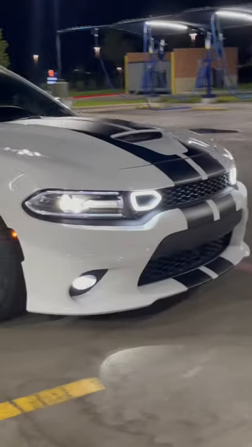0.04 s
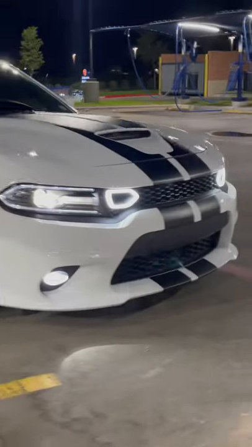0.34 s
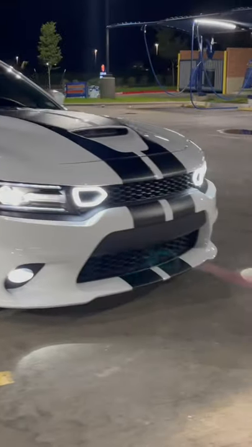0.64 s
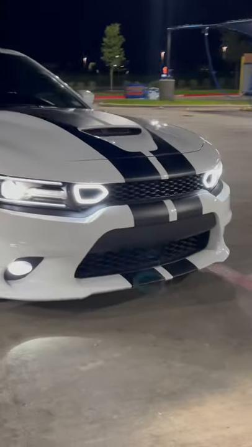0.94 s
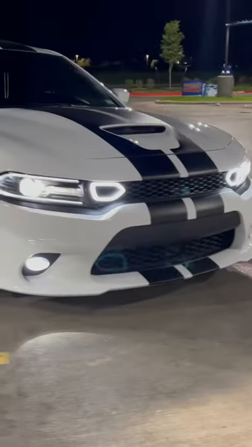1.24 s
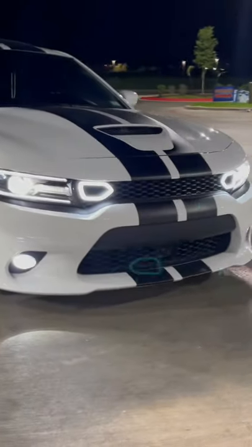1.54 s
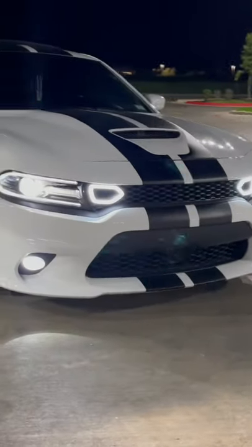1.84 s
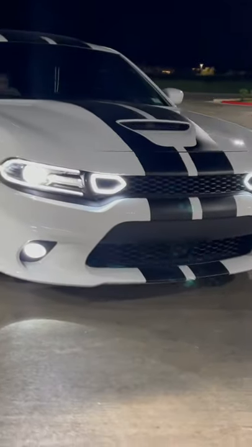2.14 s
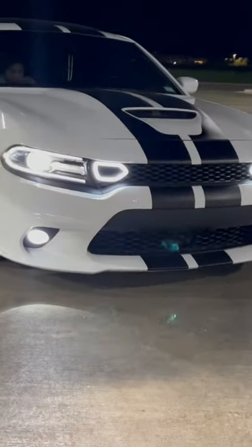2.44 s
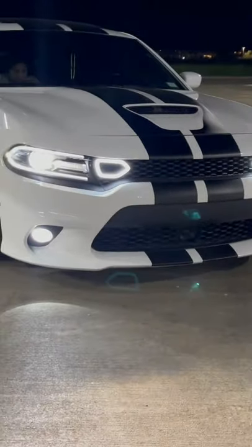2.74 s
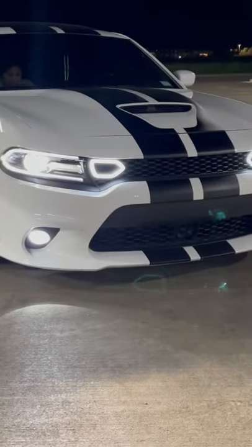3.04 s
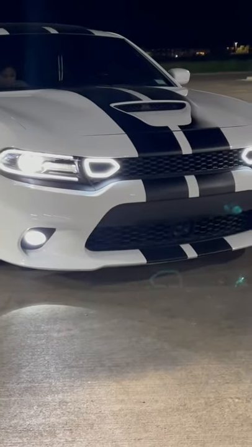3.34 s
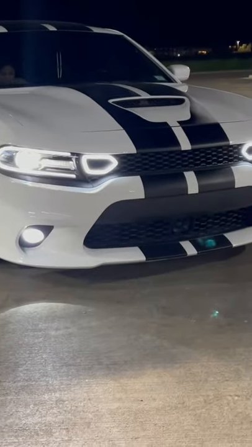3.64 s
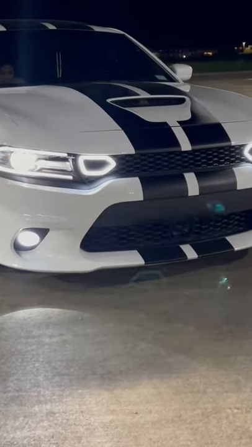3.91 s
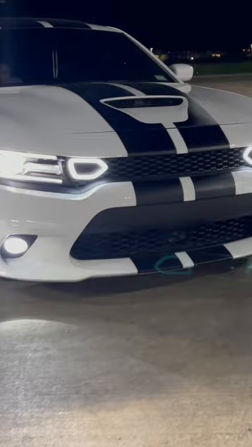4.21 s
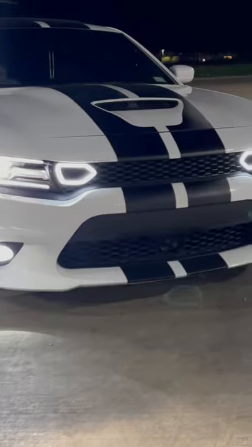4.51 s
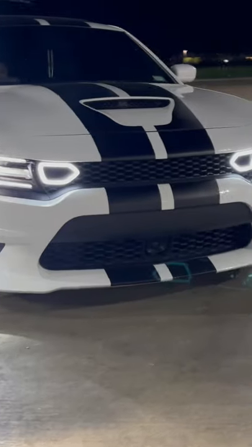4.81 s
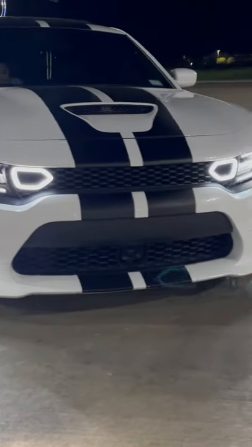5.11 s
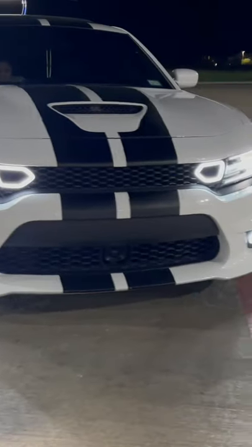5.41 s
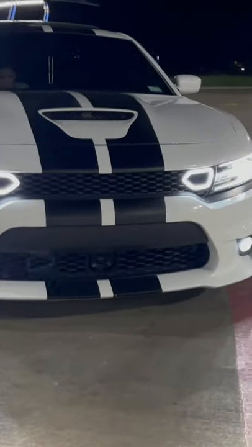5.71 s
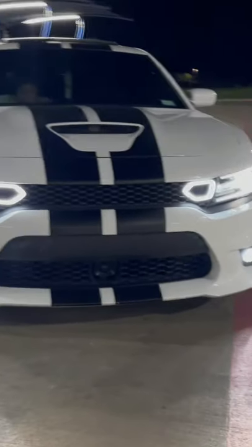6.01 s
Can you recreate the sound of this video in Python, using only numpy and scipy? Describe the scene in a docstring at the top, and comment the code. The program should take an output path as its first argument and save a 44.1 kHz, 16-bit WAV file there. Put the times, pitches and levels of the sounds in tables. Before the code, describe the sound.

A big V8 car creeps closer at idle, its exhaust throbbing under whirring belts and ticking valves.

```python
"""An open concrete lot; a big V8 saloon creeps towards a stereo microphone at idle speed.
A few dull bumps sound as it starts to roll, its exhaust muffled. Within a second the exhaust opens up,
throbbing in uneven orders over a rumble of irregular firings. The idle sags once as the car steers round,
and its nose comes to face the microphone: through the grille, the whirr of belt and fan and the ticking
of the valve gear, their hiss growing as the car draws nearer."""
import sys
import numpy as np
from scipy import signal
from scipy.fft import rfft, irfft, next_fast_len
from scipy.io import wavfile

SR = 44100
rng = np.random.default_rng(int(sys.argv[2]) if len(sys.argv) > 2 else 0)


def waveform_to_disk(signal):
    """Save audio, clipped to [-1, 1], as 16-bit WAV at the path in sys.argv[1]."""
    frames = np.transpose(np.atleast_2d(signal))
    scaled = np.clip(frames, -1, 1) * 32767
    samples = np.round(scaled).astype(np.int16)
    wavfile.write(sys.argv[1], SR, samples)


N = 275974
TIME_S = np.arange(N) / SR
FFT_SIZE = 2 * next_fast_len(N // 2 + SR // 20)   # room for tails
BIN_HZ = np.maximum(np.arange(FFT_SIZE // 2 + 1) * SR / FFT_SIZE, 1)

# the lope, six hard exhaust puffs in each engine cycle: cycle_share, relative_db
EXHAUST_PUFFS = [(.187, 0), (.436, 0), (.56, 0), (.613, .5), (.804, -3), (.938, 1.5)]
# bright spectrum of valve hiss and tyre grit: frequency_hz, relative_db
HISS_SPECTRUM = [(2500, -14), (4500, 5), (5500, 2), (6400, 2), (7600, -1), (8400, 2), (8750, 5),
                 (9200, 3.5), (10200, 5.5), (11300, 6.5), (11700, 5.5), (12300, -27)]


def from_db(db):
    """Decibels to gain."""
    return 10 ** (np.asarray(db) / 20)


def unit_rms(x):
    """Scale to unit power."""
    return x / np.sqrt(np.mean(x ** 2) + 1e-20)


def ramp(start_s, length_s):
    """An even rise from 0 to 1."""
    return np.clip((TIME_S - start_s) / length_s, 0, 1)


def swells(rows, half_length_s):
    """Envelope of bell-shaped swells, one for each row of time_s, level_db."""
    return sum(from_db(db) * np.exp(-((TIME_S - s) / half_length_s) ** 2 / 2) for s, db in rows)


def each_cycle(cycle, beats, width):
    """Rounded beats at set places of the engine cycle; width is a share of the cycle."""
    return sum(from_db(db) * np.exp(-(((cycle - place + .5) % 1 - .5) / width) ** 2)
               for place, db in beats)


def drift(rate_hz):
    """Smooth random wander of spread 1, mostly slower than rate_hz."""
    hop, settle = 100, 1000
    pole = np.exp(-2 * np.pi * rate_hz * hop / SR)
    noise = rng.standard_normal(N // hop + settle + 2)
    slow = signal.lfilter([1], [1, -2 * pole, pole * pole], noise)[settle:]
    return np.interp(np.arange(N) / hop, np.arange(len(slow)), unit_rms(slow))


def resonance(phase, width_hz):
    """A resonance stirred by noise: a carrier whose two quadratures drift."""
    return unit_rms(drift(width_hz) * np.cos(phase) + drift(width_hz) * np.sin(phase))


def over_bins(rows):
    """One curve per column over the FFT bins, straight on a log-frequency axis."""
    hz, *columns = np.transpose(rows)
    return [np.interp(np.log(BIN_HZ), np.log(hz), column) for column in columns]


def at_microphone(spectra):
    """A direct and a scattered sound reach the left and right ports of the microphone."""
    # how the two ports compare: frequency_hz, coherence, left_lead_rad, left_minus_right_db
    ports = [(100, 0.98, 0.52, -1.5), (280, 0.89, 0.48, 0.3), (480, 0.83, 0.45, 2.5),
             (560, 0.34, 0.6, -0.5), (1080, 0.32, 1.52, 0), (1173, 0.57, 0.96, 0.5),
             (1540, 0.22, 2.98, -0.3), (2140, 0.55, 5.3, -1.5), (2580, 0.46, 7.15, 1),
             (4000, 0.71, 6.96, 0.5), (5160, 0.27, 6.4, 4.5), (6540, 0.85, 6.6, 1.5), (7500, 0.6, 7.2, 1.5),
             (8700, 0.9, 6.1, -0.5), (9380, 1, 4.74, 3), (9670, 0.98, 3.53, -4.5), (10440, 1, 2.9, 0.5),
             (11080, 1, 1.32, 0)]
    coherence, lead_rad, balance_db = over_bins(ports)
    direct, scattered = spectra
    sides = np.array([[1], [-1]])
    pair = np.sqrt((1 + coherence) / 2) * direct + sides * np.sqrt((1 - coherence) / 2) * scattered
    placement = from_db(sides * balance_db / 2) * np.exp(.5j * sides * lead_rad)
    return irfft(pair * placement, FFT_SIZE)[:, :N]


def turbulence(envelope, spectrum):
    """Noise under an envelope, coloured at equal power and heard at the microphone."""
    low_hz, high_hz = spectrum[0][0], spectrum[-1][0]
    skirts = np.minimum(BIN_HZ / low_hz, 1) ** 2 * np.minimum(high_hz / BIN_HZ, 1) ** 2
    colour = unit_rms(from_db(over_bins(spectrum)[0]) * skirts)
    noise = envelope * rng.standard_normal((2, N))
    return at_microphone(rfft(noise, FFT_SIZE) * colour)


def pulsing(beats, depth):
    """A unit-power envelope that lifts on each beat."""
    return unit_rms(1 + depth * beats)


def turned_away():
    """1 while the grille points away, falling evenly to 0 as it comes to face the microphone."""
    return 1 - ramp(start_s=0.15, length_s=2.44)


def tyre_grit():
    """Light, bright ticks that sound like grit under the tyres."""
    # single ticks: start_s, relative_db
    ticks = [(.355, -60), (2.0, -66), (2.43, -54), (2.46, -58), (4.565, -56), (5.92, -53), (5.945, -63)]
    rise_s, decay_s = .002, .027
    envelope = np.zeros(N)
    for start_s, db in ticks:
        age_s = np.maximum(TIME_S - start_s, 0)
        envelope += from_db(db) * (1 - np.exp(-age_s / rise_s)) * np.exp(-age_s / decay_s)
    return from_db(7) * turbulence(envelope, HISS_SPECTRUM)


def body_bumps():
    """Blows thud in the car's body as it starts to roll; a longer contact is duller."""
    # blows to the body: start_s, relative_db, contact_s
    bumps = [(.069, -23, .0044), (.086, -20, .0041), (.109, -18, .0056), (.165, -20.5, .0015),
             (.173, -15.5, .0055), (.182, -16.5, .0012), (.209, -21, .0042), (.257, -21.5, .003),
             (.264, -16.5, .0016), (.533, -18.5, .0037), (.566, -21.5, .0012), (1.159, -19, .0022)]
    # what the body rings with: pitch_hz, relative_db, decay_s
    body_modes = [(91, -7, 0.015), (197, 0.5, 0.0092), (286, -7.5, 0.011), (337, -4.5, 0.0065),
                  (448, -6.5, 0.0066)]
    t = np.arange(SR // 5) / SR
    thud = sum((-1) ** k * from_db(db) * np.sin(2 * np.pi * hz * t) * np.exp(-t / decay_s)
               for k, (hz, db, decay_s) in enumerate(body_modes))
    thud *= 1 - np.exp(-t / 0.0035)   # the body takes a moment to answer
    blows = np.zeros(N)
    for start_s, db, contact_s in bumps:
        push = np.hanning(round(contact_s * SR) + 3)
        start = round(start_s * SR)
        blows[start:start + len(push)] += from_db(db) * push / push.sum()
    return signal.fftconvolve(blows, thud)[:N]


def belt_whines(valve_beat):
    """Narrow bands whine and hum under the bonnet, steadily or in swells, roughened by the valves; a few low
    swells of the exhaust boom sound among them."""
    # steady whines of the belt drive: pitch_hz, width_hz, relative_db
    whines = [(447, 6.1, -54), (827, 4.6, -56.5), (1198, 43, -55.5), (2157, 12, -64.5), (2260, 19, -62.5),
              (2430, 20, -60.5), (2533, 13, -66.5), (8750, 44, -74)]
    # the belt sings up again and again at one pitch: time_s, relative_db
    sings = [(1.9, -45), (2.12, -51), (2.42, -46.5), (3.14, -45), (4.15, -49), (4.97, -48), (5.38, -48),
             (5.7, -47)]
    # a lower hum of the belt drive comes and goes: time_s, relative_db
    hums = [(.19, -39), (.44, -37.5), (.76, -39.5), (1.02, -39.5), (1.36, -41), (1.6, -46), (2.79, -45.5),
            (3.58, -48), (4.1, -45)]
    # single swells: resonances under the bonnet that carry only at certain angles, and below 250 Hz brief
    # surges of the exhaust boom: time_s, pitch_hz, width_hz, half_length_s, relative_db
    beams = [(.69, 754, 53, .16, -43.5), (.735, 375, 40, .04, -37), (1.398, 1328, 84, .27, -45.5),
             (1.92, 117, 6, .13, -28.5), (2.3, 2905, 30, .2, -58), (2.7, 4010, 170, .45, -60.5),
             (2.8, 2310, 140, .6, -62), (3.25, 3110, 45, .27, -61.5), (3.8, 2990, 28, .52, -57.5),
             (4.5, 3700, 120, .6, -65), (4.9, 540.2, 56, .57, -51.5), (5.2, 1268, 47, .43, -50.5),
             (5.5, 205, 39, .45, -40.5), (6.15, 150, 30, .3, -31)]
    voices = [(hz, width_hz, from_db(db)) for hz, width_hz, db in whines]
    voices.append((1215, 48, swells(sings, half_length_s=.06)))
    voices.append((448, 15, swells(hums, half_length_s=.053)))
    voices += [(hz, width_hz, swells([(s, db)], half_s)) for s, hz, width_hz, half_s, db in beams]
    paths = [sum(gain * resonance(2 * np.pi * hz * TIME_S, width_hz) for hz, width_hz, gain in voices)
             for _ in ("direct", "scattered")]
    envelope = from_db(0.3 - 9 * turned_away()) * pulsing(valve_beat, depth=0.34)
    return envelope * at_microphone(rfft(paths, FFT_SIZE))


def pulley_hum(cycle):
    """A belt-driven pulley hums, geared to the crankshaft and wandering slightly."""
    # swells above the resting hum: time_s, level_db
    hum_swells = [(1.6, -39), (4.6, -36), (5.3, -33.5)]
    resting_db, order = -47, 13.33
    envelope = from_db(resting_db) + swells(hum_swells, half_length_s=0.32)
    phase = 2 * np.pi * order * cycle + .5 * drift(1.7)
    return envelope * np.sqrt(2) * np.sin(phase)


def engine_bay(lope):
    """The bay's drone and the whirr of belt and fan stir faintly with the lope and follow the turn."""
    # low drone of the bay: frequency_hz, relative_db
    drone_spectrum = [(60, -16.5), (150, 4), (230, 3.5), (320, -2), (450, -4), (620, -7.5), (800, -10.5),
                      (1100, -25), (2000, -43)]
    # belt and fan: frequency_hz, relative_db
    whirr_spectrum = [(400, -8.5), (700, -5.5), (830, -0.5), (1080, -1), (1210, -2.5), (1380, -3),
                      (1580, -4), (1720, -7), (2100, -14.5), (3000, -24)]
    drone_db = -38 + 3.5 * turned_away()
    drone = from_db(drone_db) * turbulence(pulsing(lope, depth=0.019), drone_spectrum)
    whirr_db = -45 - 0.3 * turned_away() + 0.89 * drift(10.4)
    whirr = from_db(whirr_db) * turbulence(pulsing(lope, depth=0.044), whirr_spectrum)
    return drone + whirr


def valve_gear(valve_beat):
    """Clatter and hiss pulse with the valves; the hiss grows as the car nears the microphone."""
    # clatter through the grille: frequency_hz, relative_db
    clatter_spectrum = [(1400, -12), (1740, -11), (1910, 2), (2080, -4.5), (2270, -1), (2480, -0.5),
                        (2750, -6.5), (2980, -2.5), (3350, -6.5), (4000, -7), (4600, -17), (6500, -17.5)]
    approach_db_per_s = 0.41
    clatter_db = -51 - 1.5 * turned_away() + drift(14)
    clatter = from_db(clatter_db) * turbulence(pulsing(valve_beat, depth=0.065), clatter_spectrum)
    hiss_db = -56 + 0.8 * turned_away() + approach_db_per_s * TIME_S + 1.03 * drift(25)
    hiss = from_db(hiss_db) * turbulence(pulsing(valve_beat, depth=0.33), HISS_SPECTRUM)
    return clatter + hiss


def exhaust_muffling():
    """Two curves from 1 (muffled) to 0 (open): the exhaust opens quickly, its deepest notes slowly."""
    return 1 - ramp(start_s=0.786, length_s=0.077), 1 - ramp(start_s=0.8, length_s=0.44)


def exhaust_rumble(lope):
    """No two firings are alike: their differences rumble with the lope and boom in a broad resonance."""
    # deep rumble: frequency_hz, relative_db
    rumble_spectrum = [(20, -31), (32, -28), (43, -11), (60, 0.5), (75, -0.5), (100, -8), (160, -7.5),
                       (200, -16), (240, -12), (300, -18.5), (500, -39)]
    # centre of the boom, shifting as the car turns: time_s, pitch_hz
    boom_pitch = [(0, 140), (.85, 127.1), (3.2, 109.1), (6.26, 128.3)]
    muffled, deep_muffled = exhaust_muffling()
    rumble = from_db(-31 - 8.5 * deep_muffled) * turbulence(pulsing(lope, depth=0.51), rumble_spectrum)
    boom_hz = np.interp(TIME_S, *np.transpose(boom_pitch))
    boom = resonance(2 * np.pi * np.cumsum(boom_hz) / SR, width_hz=13)
    boom = unit_rms(boom / (np.abs(signal.hilbert(boom)) + 0.79))   # keeps a fairly even strength
    surge = swells([(1.03, 0)], half_length_s=0.18)   # one swell just after opening
    boom_db = -36 - 13 * muffled + 7 * surge
    return rumble + from_db(boom_db) * boom * pulsing(lope, depth=0.19)


def exhaust_throb(cycle):
    """Each bank fires unevenly, so many multiples of the cycle rate sound, adding up at each puff."""
    # exhaust tones at three angles to the microphone: order, oblique_db, nearly_head_on_db, head_on_db
    orders = [(8, -46, -46, -50), (11, -43, -53, -41), (13, -41, -53, -42), (16, -30, -29, -30),
              (17, -44, -45, -45), (18, -47, -44, -44), (19, -48, -43, -45), (21, -41, -36, -36),
              (22, -38, -40, -40), (23, -44, -46, -53), (24, -38, -36, -35), (25, -44, -43, -39),
              (27, -50, -47, -54), (28, -38, -39, -48), (29, -38, -40, -47), (32, -51, -48, -42),
              (35, -54, -50, -64), (40, -52, -59, -48), (42, -59, -60, -49), (43, -58, -53, -50),
              (45, -53, -48, -51), (46, -45, -44, -66), (48, -58, -55, -66), (73, -73, -69, -58)]
    angle_times_s = (1.6, 3.56, 5.15)   # when the car passes through those angles
    top_deep_order = 16
    muffled, deep_muffled = exhaust_muffling()
    places, puff_db = np.transpose(EXHAUST_PUFFS)
    tones = np.zeros(N)
    for order, *angle_db in orders:
        puff_phase = np.angle(np.sum(from_db(puff_db) * np.exp(-2j * np.pi * order * places)))
        phase = 2 * np.pi * order * cycle + puff_phase + 0.0053 * order * drift(1.9)
        level_db = np.interp(TIME_S, angle_times_s, angle_db) + 2 * drift(8.4)
        level_db -= 8.5 * deep_muffled if order <= top_deep_order else 15 * muffled
        tones += from_db(level_db) * np.sqrt(2) * np.sin(phase)
    grouping_db = 1.6 * np.tanh(drift(8))   # the puffs roll in stronger and weaker groups
    return tones * unit_rms(from_db(grouping_db))


def crank_rpm():
    """The crankshaft idles, and sags once under load while the car steers round."""
    idle_rpm, sag_rpm = 660.26, 10.8
    load = ramp(start_s=1.634, length_s=.2) - ramp(start_s=3.074, length_s=.434)
    return idle_rpm - sag_rpm * load


def scene():
    """The car as heard at the microphone; one four-stroke cycle, two crank turns, times the engine."""
    # the louder valve ticks in each cycle: cycle_share, relative_db
    valves = [(.05, 3.5), (.23, -7), (.46, -8), (.72, -19), (.85, -0.5), (.97, -1)]
    cycle = np.cumsum(crank_rpm()) / (2 * 60 * SR)
    lope = each_cycle(cycle, EXHAUST_PUFFS, width=0.043)
    lope *= from_db(3.3 * drift(27))   # some puffs hit harder
    valve_beat = each_cycle(cycle, valves, width=0.029)
    exhaust = exhaust_throb(cycle) + exhaust_rumble(lope)
    bonnet = pulley_hum(cycle) + engine_bay(lope) + valve_gear(valve_beat) + belt_whines(valve_beat)
    return exhaust + bonnet + body_bumps() + tyre_grit()


def record(dry):
    """The top treble is cut steeply."""
    cutoff_hz = 12300
    return signal.sosfilt(signal.ellip(10, .1, 80, cutoff_hz, fs=SR, output="sos"), dry)


dry = scene()
out = record(dry)
waveform_to_disk(out)
```